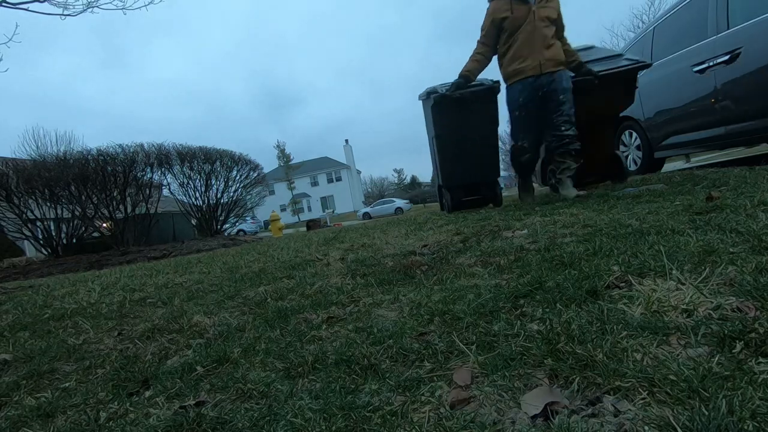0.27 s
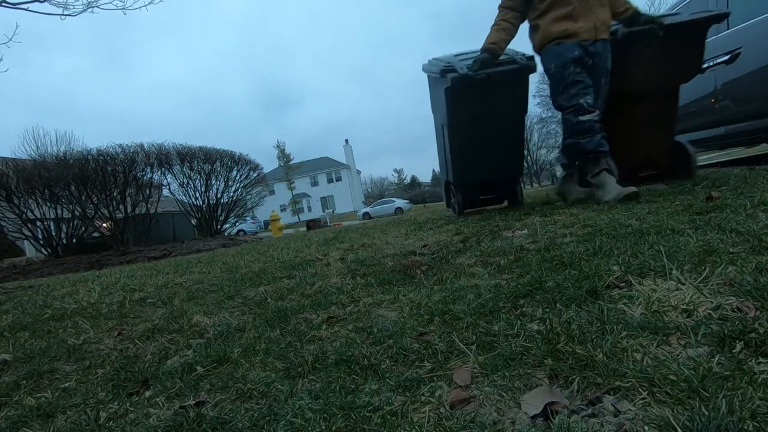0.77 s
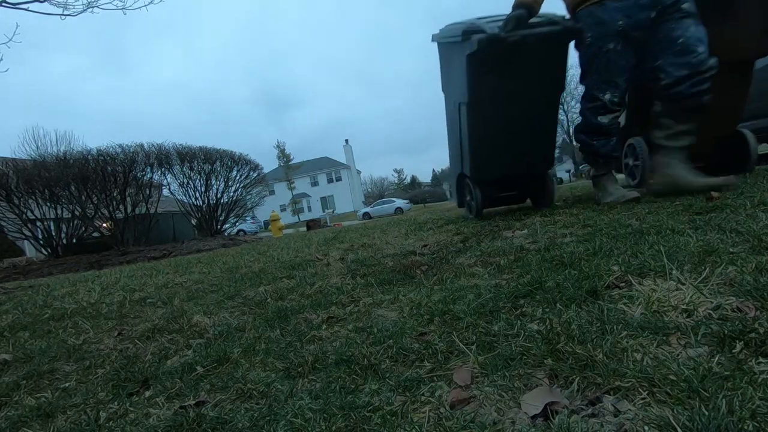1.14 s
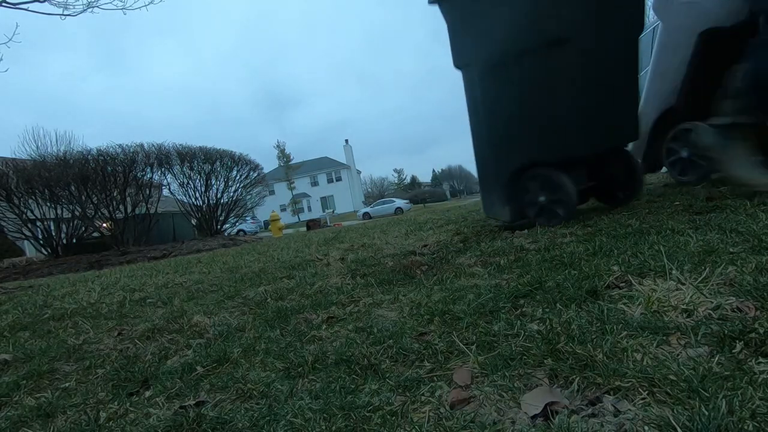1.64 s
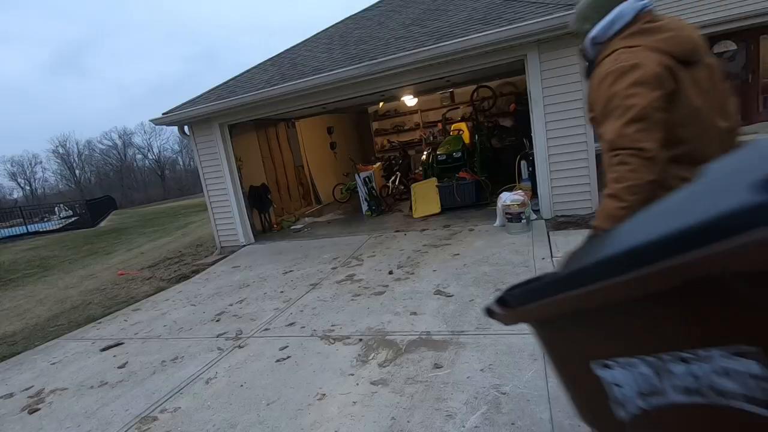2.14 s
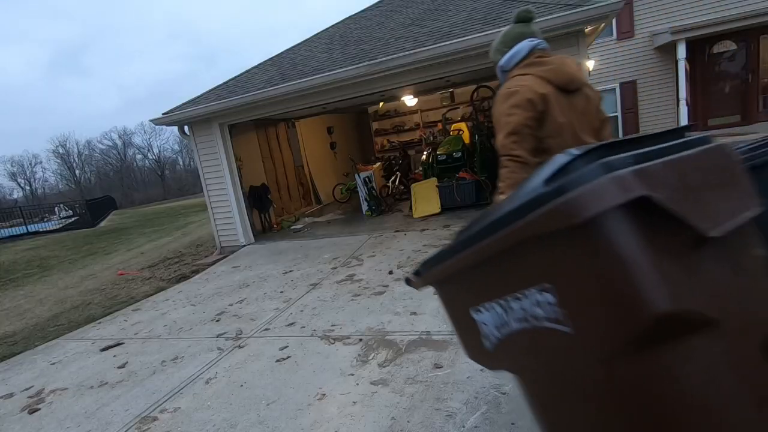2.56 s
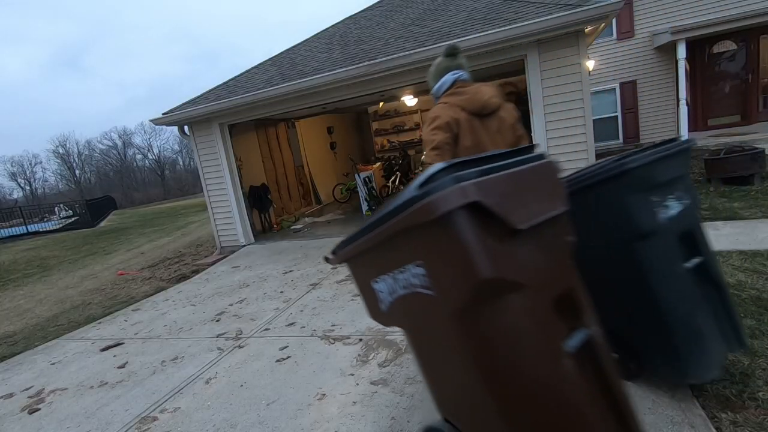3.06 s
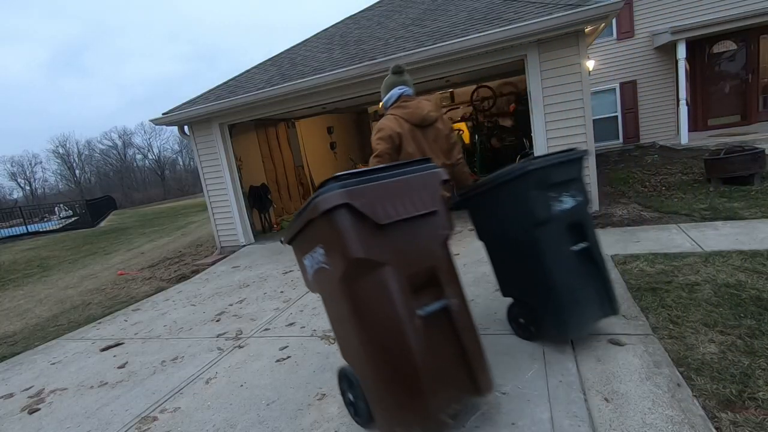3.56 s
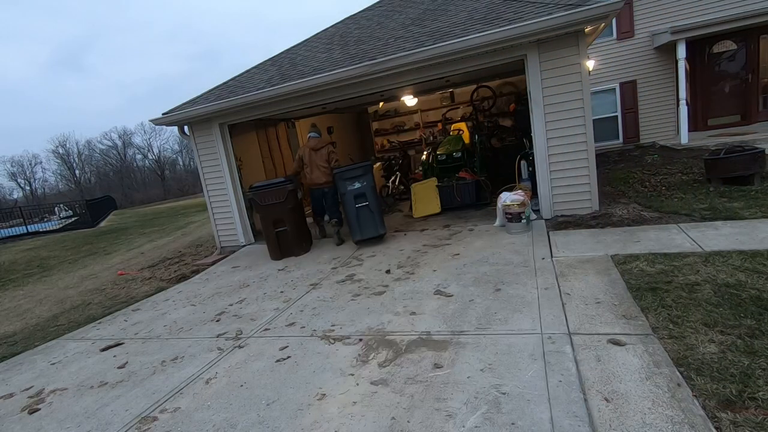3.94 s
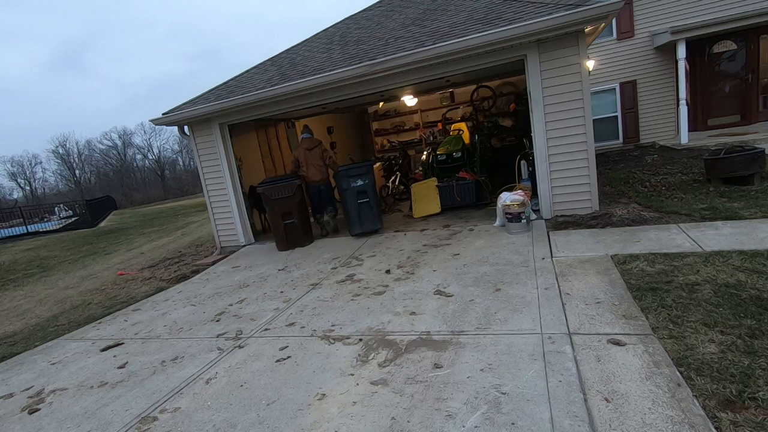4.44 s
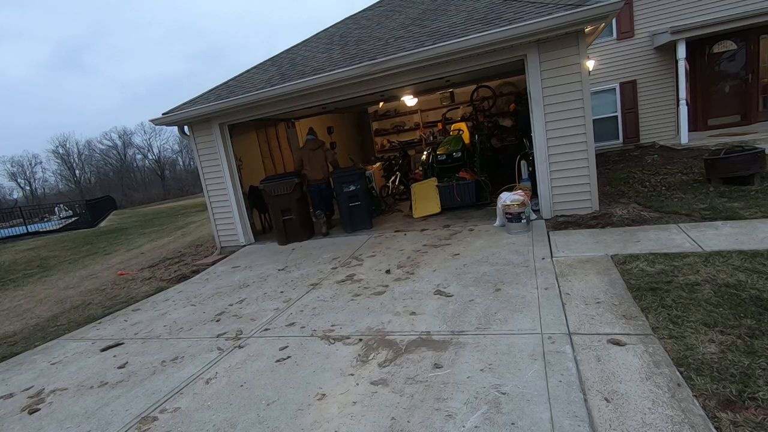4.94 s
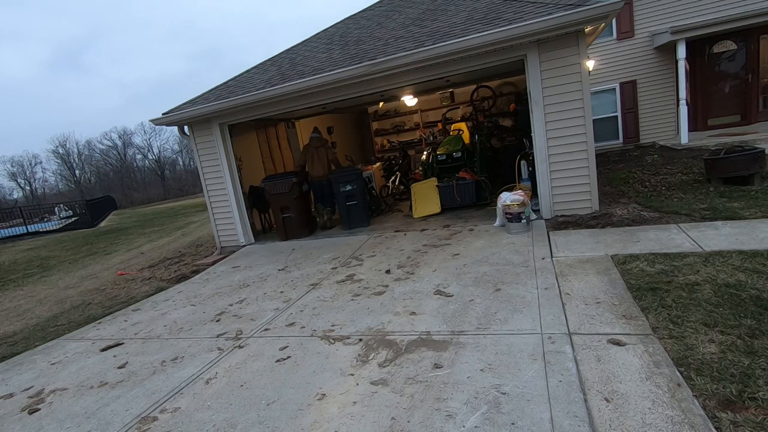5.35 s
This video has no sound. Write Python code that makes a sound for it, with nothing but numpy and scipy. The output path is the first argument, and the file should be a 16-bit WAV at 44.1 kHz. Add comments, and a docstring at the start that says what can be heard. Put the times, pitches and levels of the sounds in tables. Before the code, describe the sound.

Dragged plastic trash bins boom, knock and clatter over rough ground, cut to a close driveway rattle, then recede into a reverberant garage.

```python
"""Two hollow plastic bins bump past on the right over a lawn edge, dragged on their wheels.
Then they are heard close by on concrete, after a splice click, and last far off in an echoing garage.
Rough ground shakes tubs, walls and lids, which ring at their own pitches; grit and shoes hiss.
Knocks and ticks are single pushes that set a wall, lid or small part ringing.
A small camera hears it in stereo, over a low sway and an air hiss."""
import sys
import numpy as np
from scipy import signal
from scipy.fft import rfft, irfft
from scipy.io import wavfile
from scipy.ndimage import uniform_filter1d

SR = 44100
rng = np.random.default_rng(int(sys.argv[2]) if len(sys.argv) > 2 else 0)


def unload_wav(signal):
    """Save mono or channel-first audio to the path in sys.argv[1] as 16-bit WAV at rate SR, clipped to [-1, 1]."""
    wavfile.write(
        sys.argv[1],
        SR,
        np.round(np.clip(np.atleast_2d(signal).T, -1, 1) * 32767).astype(np.int16),
    )


N = 246757


def undb(db):
    """Turn decibels into a plain multiplier."""
    return 10 ** (np.asarray(db) / 20)


def unit(x):
    """Scale to an average strength (rms) of 1."""
    return x / np.sqrt(np.mean(x ** 2))


def band(x, hz, width):
    """Two-pole resonance, gain 1 at its centre."""
    return signal.lfilter(*signal.iirpeak(hz, hz / width, SR), x)


def twice(x, hz, width):
    """Steeper resonance: the same one passed twice."""
    return band(band(x, hz, width), hz, width)


def butter(x, order, hz, kind="low"):
    """Keep what lies below hz, or above it for kind "high"."""
    return signal.sosfilt(signal.butter(order, hz, kind, fs=SR, output="sos"), x)


def ring(x, modes):
    """Sum of resonances; neighbours swing in opposite senses."""
    out = 0
    for k, (hz, width, db) in enumerate(modes):
        out = out + (-1) ** k * undb(db) * band(x, hz, width)
    return out


def walk(rate):
    """Random wander that glides to a new value `rate` times a second."""
    hold = int(SR / rate)
    steps = np.repeat(rng.standard_normal(N // hold + 1), hold)
    return 2.2 * uniform_filter1d(steps, hold)[:N]


def add(track, s, sound):
    """Mix a short sound into the track, starting at s seconds."""
    i = int(s * SR)
    track[i:i + len(sound)] += sound[:N - i]


# Listening spots, in turn: (start time [s], how far right [0-1], scattered width level [dB],
# low sway level [dB], air hiss level [dB], boost of the upper lid rattle [dB])
LISTENING_SPOTS = [(0, 0.45, -12.5, -68, -66.5, 3.5), (2.007, 1, -12, -29, -76, -0.5),
                   (3.716, 0.3, -36, -32.5, -57, 5)]
SPOT_STARTS = [row[0] for row in LISTENING_SPOTS]


def spot_at(t):
    """Number of the listening spot in use at time t."""
    return np.searchsorted(SPOT_STARTS, t, side="right") - 1


def low_sway(db):
    """Noise through a steep low resonance, with a wandering level."""
    noise = rng.standard_normal(N)
    return undb(db + 0.44 * walk(7.9)) * unit(twice(noise, 49, 84))


# Broad colours of the air hiss: (pitch [Hz], width [Hz], level [dB])
AIR_COLOURS = [(1070, 1100, 11), (3400, 2700, 1.9), (7660, 5500, 5)]


def air_hiss(db):
    """Noise through three broad resonances, with a wandering level."""
    noise = rng.standard_normal(N)
    return undb(db + 0.3 * walk(6.3)) * unit(ring(noise, AIR_COLOURS))


def garage(x):
    """Dense bright echo of a bare room, for everything that sounds once the bins are indoors."""
    t60_s, level_db, centre_hz = 0.62, -8, 2630  # t60: time to die away by 60 dB
    t = np.arange(SR // 2) / SR
    tail = band(rng.standard_normal(len(t)), centre_hz, 8200) * undb(-60 * t / t60_s)
    indoors = x * np.clip((np.arange(N) / SR - SPOT_STARTS[-1]) / 0.01, 0, 1)
    return undb(level_db) * signal.fftconvolve(indoors, tail / np.sqrt(np.sum(tail ** 2)))[:N]


# Short detours of the sound round nearby things: (delay [ms])
DETOURS_MS = (.6, 1.1, 1.9, 3.1, 4.3)


def echoes(x):
    """A chain of short recirculating detours: it scrambles the phase and leaves the colour alone."""
    spectrum = rfft(x)
    turn_per_ms = -2j * np.pi * np.arange(N // 2 + 1) / N * SR / 1000
    for ms in DETOURS_MS:
        late = np.exp(turn_per_ms * ms)
        spectrum = spectrum * (0.5 + late) / (1 + 0.5 * late)
    return irfft(spectrum, N)


def sideways(x):
    """Stereo difference for a source on the right: two close ports, out of step in the treble."""
    lagging = np.roll(twice(x, 10000, 5000), 1)  # one sample late
    middle = twice(x, 770, 840)
    steered = signal.lfilter(*signal.butter(1, 300, "high", fs=SR), middle)
    return 0.52 * lagging - 0.47 * steered - 0.5 * band(x, 1470, 3000)


def jumps(rate, spread_db, fade_s):
    """Scattered impacts, mostly small and a few large; each starts at once and fades; rms 1."""
    hit, size = rng.random(N), rng.exponential(size=N)
    strikes = (hit < rate / SR) * undb(spread_db * np.minimum(size, 2.5))
    return unit(signal.lfilter([1], [1, -np.exp(-1 / (fade_s * SR))], strikes))


def shaken(modes, shared, loose, contact_s, hits_per_s=SR):
    """Resonances driven by rough contact: a shaking shared by all, plus loose parts striking one each.
    A longer contact pushes more softly and spares the treble; fewer hits turn the hiss into a rattle."""
    keep, out = np.exp(-1 / (contact_s * SR)), 0
    hits = 1.0 * (rng.random(N) < hits_per_s / SR)
    shared = shared * unit(hits)
    for hz, width, db in modes:
        push = (shared + loose * jumps(40, 4.5, 0.0082)) * rng.standard_normal(N)
        softened = signal.lfilter([1], [1, -2 * keep, keep ** 2], push)
        out = out + undb(db) * band(softened, hz, width)
    return unit(out)


# Jolts that set the bins shaking: (peak time [s], build-up [s], dying-away of the tub [s],
# tub level [dB], walls level [dB], lids level [dB]); build-up and dying-away are each for 20 dB
GROUND_JOLTS = [(0.019, 0.44, 0.16, -17, -13, -33.5), (0.188, 0.25, 0.2, -23, -18.5, -44.5),
                (0.362, 0.073, 0.5, -22, -34, -69), (0.641, 0.065, 4.7, -22.5, -26.5, -62),
                (0.942, 0.016, 0.87, -14.5, -16, -27), (1.108, 0.023, 4.1, -21, -19.5, -49.5),
                (1.565, .03, 0.43, -17, -16.5, -32), (1.77, 0.019, 5.5, -43, -28.5, -61),
                (2.031, 0.025, 0.44, -19.5, -21.5, -29), (2.341, 0.12, 0.89, -14.5, -19, -22.5),
                (2.499, 0.037, 1.9, -23, -18.5, -31.5), (2.77, 0.035, 1.2, -19.5, -17.5, -39),
                (2.867, 0.16, 0.19, -26, -21, -19), (3.03, 0.079, 0.55, -42, -30, -58),
                (3.159, 0.079, 0.94, -18.5, -19, -29.5), (3.302, 0.45, 1.2, -18.5, -23, -22.5),
                (3.59, 0.23, 0.44, -23.5, -42, -28), (3.68, 0.22, 0.28, -22.5, -45, -29),
                (3.821, 0.18, 0.16, -19, -20, -32), (4.11, 0.069, 0.59, -25.5, -25.5, -33),
                (4.269, 0.29, 0.41, -15.5, -20.5, -28), (4.489, 0.33, 0.32, -22.5, -34, -49),
                (4.69, 0.26, 0.32, -16.5, -22, -30), (4.777, 0.046, 0.15, -7.5, -15.5, -13.5),
                (5.059, 0.087, 0.26, -19.5, -33.5, -31), (5.368, 0.36, 0.66, -33, -42.5, -47),
                (5.495, 0.058, 1.5, -28, -27, -32.5)]


def shaking(haste, column):
    """Loudness of one part: jolts build up, die away `haste` times faster, and stay within their spot."""
    t = np.arange(0, N, 128) / SR
    power = 1e-9
    for s, rise_s, fade_s, *part_db in GROUND_JOLTS:
        drop_db = 20 * np.maximum((s - t) / rise_s, haste * (t - s) / fade_s)
        same_spot = spot_at(t) == spot_at(s)
        power = power + same_spot * undb(part_db[column] - drop_db) ** 2
    return np.interp(np.arange(N) / SR, t, np.sqrt(power))


# Colours of the grit: (pitch [Hz], width [Hz], level [dB])
GRIT_COLOURS = [(3040, 1800, 3), (5300, 3900, -8), (7740, 1300, -1)]
# Loudness of the grit hiss, before a small random wander: (time [s], level [dB])
GRIT_LEVELS = [(0, -55), (1.302, -54.5), (1.998, -54.5), (2.048, -63), (2.4, -52), (2.731, -85), (2.8, -59),
               (3.3, -44.5), (3.75, -54.5), (4.5, -51), (4.76, -45.5), (5.0, -68), (5.402, -51.5),
               (5.42, -35.5), (5.49, -43.5), (5.6, -94)]


def grit_hiss(ground):
    """Grit and shoes: very short contacts make a bright hiss that follows the bumps."""
    level_db = np.interp(np.arange(N) / SR, *np.transpose(GRIT_LEVELS))
    hiss = shaken(GRIT_COLOURS, 0.87 + 0.55 * ground, 0.27, 0.00002)
    return hiss * undb(level_db + 0.4 * walk(30))


# Pitches of the side walls: (pitch [Hz], width [Hz], level [dB])
WALL_PITCHES = [(187.4, 17, -2.5), (247.2, 43, -3), (286.2, 35, 1), (331.6, 45, -0.5), (430, 120, -9)]


def wall_rumble(ground):
    """Thin walls ring above the tub, are softened above 430 Hz and die away faster."""
    walls = shaken(WALL_PITCHES, 0.4 + 0.5 * ground, 0.47, 0.00028)
    return butter(walls, 2, 430) * shaking(2.6, column=1)


# Pitches of the hollow tub: (pitch [Hz], width [Hz], level [dB])
TUB_PITCHES = [(54.3, 39.5, -8.5), (77.9, 6.5, 3.5), (100.4, 57.3, -2.5), (152.4, 10.7, -6)]


def tub_swing(ground):
    """The hollow tub booms at its low pitches as the ground shakes it, before the jolts set its loudness."""
    return shaken(TUB_PITCHES, 1 + 0.61 * ground, 0.1, 0.00023)


# Pitches of the lids: (pitch [Hz], width [Hz], level [dB])
LID_PITCHES = [(516, 118, 7.5), (705, 143, 9), (901, 200, 5), (1188, 186, -1), (1354, 130, 1.5),
               (1725, 1010, -7.5), (2180, 380, -11), (2980, 480, -16.5), (3800, 700, -26.5)]


def lid_rattle(ground, tub):
    """Loose lids clap on each outward swing of the tub; their upper rattle changes with the spot."""
    chatter = 1 + 1.5 * np.clip(tub, 0, 1)
    push = (0.21 + 0.28 * ground) * chatter
    lid = shaken(LID_PITCHES, push, 0.51, 0.00004, hits_per_s=800) * shaking(2.3, column=2)
    upper = butter(lid, 2, 1600, "high")
    upper_gain = undb([row[-1] for row in LISTENING_SPOTS])[spot_at(np.arange(N) / SR)]
    return lid + (upper_gain - 1) * upper


def rolling():
    """The same wheel bumps reach tub, walls, lids and grit together."""
    ground = jumps(60, 0.78, 0.0095)
    tub = tub_swing(ground)
    grit, walls, lid = grit_hiss(ground), wall_rumble(ground), lid_rattle(ground, tub)
    return tub * shaking(1.0, column=0) + walls + lid + grit


def splice_click():
    """A splice click, one sample long, where one shot is cut to the next at the second spot."""
    out = np.zeros(N)
    out[int(SPOT_STARTS[1] * SR)] = undb(-13.5)
    return out


# Ticks of lids, axles and pebbles: (time [s], level [dB], pitch [Hz])
SMALL_TICKS = [(0.0116, -26, 3940), (0.173, -32, 3800), (0.8222, -28, 2330), (0.9657, -18.5, 1840),
               (1.0072, -20.5, 2150), (1.032, -26, 6200), (1.1017, -22, 3740), (1.236, -35, 2600),
               (1.326, -23, 1420), (1.385, -26.5, 870), (1.811, -24, 3000), (2.101, -29, 950),
               (2.246, -26.5, 4280), (2.289, -31, 1700), (2.329, -18, 1560), (2.494, -20.5, 1496),
               (2.712, -33, 2120), (2.796, -19.5, 1530), (2.821, -19.5, 1410), (2.871, -27.5, 3370),
               (2.956, -35, 5770), (2.9955, -10.5, 4770), (3.072, -23, 3600), (3.083, -23, 5660),
               (3.122, -15.5, 1055), (3.147, -19.5, 1550), (3.186, -21.5, 2070), (3.227, -22, 1520),
               (3.28, -24, 1470), (3.301, -20, 1770), (3.3111, -13.5, 3000), (3.3323, -22, 5800),
               (3.349, -14.5, 1950), (3.3863, -28, 4980), (3.435, -31.5, 5840), (3.543, -31, 1610),
               (3.5838, -20, 2950), (3.6287, -21.5, 3300), (3.753, -30, 4220), (3.7726, -18, 1660),
               (3.836, -30.5, 7000), (3.9082, -28, 4380), (4.0848, -27, 3720), (4.1282, -25.5, 4280),
               (4.205, -28, 1540), (4.231, -29, 2060), (4.5695, -20, 3570), (5.0674, -33, 2690),
               (5.291, -32.5, 2590)]


def ticks():
    """Hard little contacts: a noise burst swells for 2 ms and fades, ringing round its own pitch."""
    out, t = np.zeros(N), np.arange(SR // 10) / SR
    snap = t / 0.002 * np.exp(1 - t / 0.002)
    shiver = 0.34 * np.exp(-t / 0.023) * np.minimum(t / 0.0043, 1)
    for s, db, hz in SMALL_TICKS:
        push = rng.standard_normal(len(t)) * (snap + shiver)
        push[SR // 1000] += 5.0  # the first contact
        broad_edge = undb(-20.5) * band(push, hz, 2 * hz)
        tick = twice(push, hz, 0.78 * hz) + broad_edge
        add(out, s, undb(db) * tick / np.max(np.abs(tick)))
    return out


# Wheel drops and wall knocks: (time [s], level [dB], ringing pitch [Hz], lid slap level [dB])
HARD_KNOCKS = [(0.014, -7, 280, -22), (0.356, -13.5, 187, -43), (0.627, -18.5, 102.5, -30.5),
               (0.702, -12, 252, -26), (0.819, -6.5, 154, -19.5), (0.843, -7, 255, -30),
               (0.933, -3.5, 254, -21), (0.965, -10, 276, -16.5), (1.005, -10, 93.5, -14.5),
               (1.104, -6, 208, -15.5), (1.236, -27, 114, -21.5), (1.385, -16, 250, -23),
               (1.439, -18, 134, -23.5), (1.471, -7.5, 171, -24), (1.541, -2.5, 257, -17.5),
               (1.618, -17, 222, -25.5), (1.763, -9.5, 239, -32), (1.8143, -1.5, 220, -16),
               (2.009, -17.5, 226, -20), (2.051, -38, 143, -14.5), (2.291, -11, 198, -46),
               (2.329, -9.5, 202, -9.5), (2.425, -20, 203, -14), (2.477, -22, 109, -9.5),
               (2.563, -11, 160, -13.5), (2.597, -10, 197, -14.5), (2.63, -20, 233, -16.5),
               (2.758, -10, 127.7, -24), (2.796, -18, 98, -11), (3.227, -6.5, 133, -12),
               (3.351, -12, 115.4, -20), (3.637, -12, 88.4, -21), (3.661, -13, 87, -19),
               (3.775, -24, 288, -13), (4.619, -19, 143, -16), (4.753, -4, 115, -12),
               (4.776, -16, 111, -16), (5.047, -11.5, 130, -22.5)]


def knocks():
    """A short push sets one wall panel ringing and slaps the lid, which shivers on."""
    out, t = np.zeros(N), np.arange(SR // 5) / SR
    shiver = np.minimum(t / 0.002, 1) * (np.exp(-t / 0.0071) + 0.19 * np.exp(-t / 0.04))
    for s, db, hz, slap_db in HARD_KNOCKS:
        cycles = t * hz
        fading = np.exp(-cycles / 2.3) + 1.08 * np.exp(-cycles / 0.43)  # the first swing is widest
        swing = fading * np.minimum(cycles * 1.45, 1)
        add(out, s, undb(db) * np.sin(2 * np.pi * cycles) * swing)
        # each slap lands elsewhere, so the balance of the lid's pitches varies
        place = rng.standard_normal(len(LID_PITCHES))
        struck = [(f, w, g + 1.8 * r) for (f, w, g), r in zip(LID_PITCHES, place)]
        soft = butter(rng.standard_normal(len(t)), 2, 4500)
        clap = ring(shiver * soft, struck)
        add(out, s + 0.001037, undb(slap_db) * clap / np.max(np.abs(clap)))
    return out


def scene():
    """Place the bins, their echoes, the sway and the air in stereo, one listening spot after another."""
    bins = rolling() + splice_click() + ticks() + knocks()
    bins = bins + garage(bins)
    scattered = echoes(bins)
    aimed = sideways(bins)
    # scattered sound arrives from all round, most unevenly in the treble
    spread = sideways(scattered) + 4.2 * band(scattered, 10000, 6000)
    t, mid, side = np.arange(N) / SR, bins, 0
    ends = SPOT_STARTS[1:] + [N / SR]
    for (start, right, width_db, sway_db, air_db, _), end in zip(LISTENING_SPOTS, ends):
        now = (t >= start) & (t < end)
        mid = mid + now * (low_sway(sway_db) + air_hiss(air_db))
        placed = right * aimed + undb(width_db) * spread
        surround = 0.29 * low_sway(sway_db) + 1.3 * band(air_hiss(air_db), 7500, 6000)
        side = side + now * (placed + surround)
    return np.array([mid + side, mid - side])


def record(dry):
    """The camera rounds the loudest peaks, loses the deep bass, dulls the treble and cuts the top."""
    rounded = np.tanh(0.87 * dry) / 0.94
    x = butter(rounded, 2, 42, "high")
    x = 0.082 * x + 0.79 * butter(x, 6, 9900)
    x = x * np.minimum(np.arange(N)[::-1] / (0.004 * SR), 1)  # fade out over the last 4 ms
    return signal.sosfilt(signal.ellip(8, 0.2, 70, 15800, fs=SR, output="sos"), x)


dry = scene()
out = record(dry)
unload_wav(out)
```